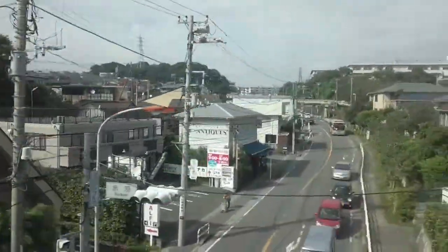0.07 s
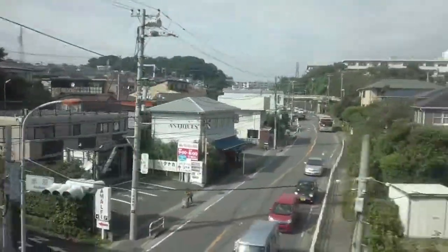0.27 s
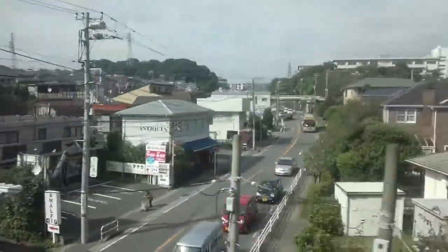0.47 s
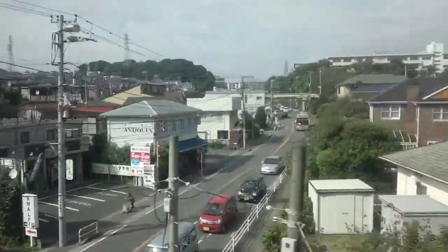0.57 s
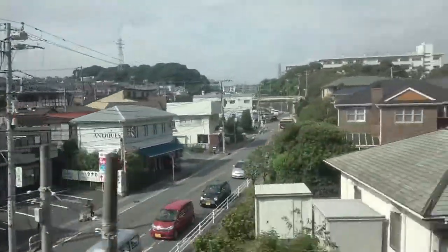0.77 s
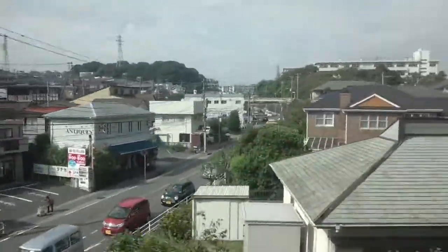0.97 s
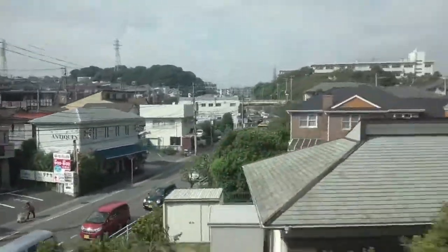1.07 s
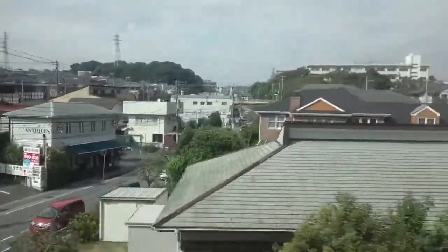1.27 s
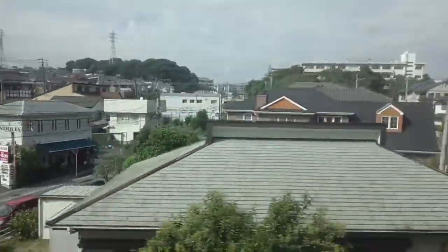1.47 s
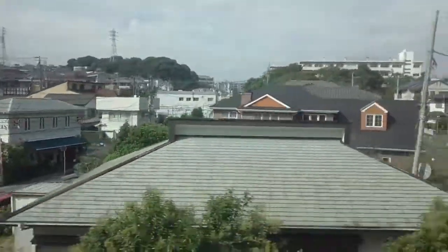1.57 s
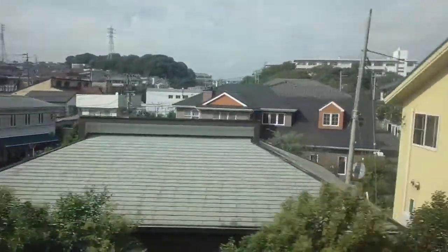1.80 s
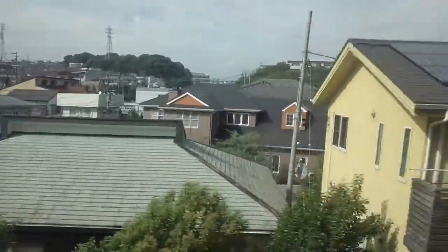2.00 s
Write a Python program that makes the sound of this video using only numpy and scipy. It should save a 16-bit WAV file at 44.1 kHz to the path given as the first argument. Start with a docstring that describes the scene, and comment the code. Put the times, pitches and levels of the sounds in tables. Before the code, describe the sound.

Inside a moving monorail car, low rumble and boom continue under loose panel knocks, thumps and faint ticks

```python
"""Suspended monorail car, interior

Heard from inside a moving car on rubber tyres: filtered noise makes the low sway and rumble, the
rush of the tyres and a thin hiss, and noise through cabin resonances makes the boom. Track bumps
thump the body in damped modes, and a loose panel knocks with a crack, a short ring and a low thud.
The fittings give ticks, each a snap and a brief crunch, and brief rattles of grainy noise."""
import sys
import numpy as np
from scipy import signal
from scipy.fft import rfft, irfft, next_fast_len
from scipy.io import wavfile
from scipy.ndimage import uniform_filter1d, map_coordinates

SR = 44100
rng = np.random.default_rng(int(sys.argv[2]) if len(sys.argv) > 2 else 0)


def transcribe(signal):
    """Save signal, clipped to [-1, 1], as a 16-bit WAV file at the path in sys.argv[1]."""
    frames = np.atleast_2d(signal).T
    limited = np.clip(frames, -1, 1)
    pcm = np.round(limited * 32767).astype(np.int16)
    wavfile.write(sys.argv[1], SR, pcm)


N = 89919  # samples

# Loose panel, its knocks: start_s, ring_db, crack_db, thud_db, crack_t60_s, crack_top_hz
PANEL_KNOCKS = [(0.0434, -0.5, -24.5, -9, 0.021, 4800), (.165, -11.5, -32.5, -5, 0.019, 4000),
                (0.2936, -22.5, -42, -29, .014, 2000), (0.7998, -4, -24, -7.5, 0.029, 6000),
                (0.8042, -19.5, -27, -4.5, 0.021, 6200), (0.955, -3.5, -28, -1, 0.034, 5660),
                (1.2974, -2, -22.5, 2.5, 0.025, 6230), (1.401, -16.5, -34.5, -13, .025, 4200),
                (1.593, -5.5, -26, -1, 0.016, 5000), (1.597, -11.5, -27.5, -27, 0.0094, 4800),
                (1.91, -1.5, -25, 2, 0.031, 6200), (2.01, -12, -42, -3.5, 0.023, 5000)]
# Loose panel, its ringing modes: pitch_hz, relative_level_db, t60_s
PANEL_MODES = [(485.4, -7.5, 0.021), (594, -0.5, 0.016), (590, -25.5, 0.031), (1005, -19, .009)]
# Mean spectrum of the panel's crack, before scatter: frequency_hz, relative_level_db
CRACK_SPECTRUM = [(300, -17.5), (900, 9.5), (1500, 3.5), (2300, 5.5), (3000, -3), (4200, 4), (6000, -6.5),
                  (8500, -12), (12000, -71)]
# Bumps in the track: start_s, level_db, pitch_hz, t60_s
TRACK_BUMPS = [(0.028, -7, 119, 0.13), (0.215, -7, 227.4, .13), (.297, -6.5, 90, 0.046),
               (0.336, -5.5, 211, 0.13), (.443, -17, 229.2, 0.11), (0.544, -9, 324, 0.082),
               (0.859, 0.5, 175, 0.037), (0.965, -20, 232.8, 0.35), (1.021, 2, 172, 0.017),
               (1.094, -13, 71, .09), (1.113, -1, 177, 0.044), (1.142, -8.5, 79, 0.082),
               (1.236, -12.5, 67.4, 0.19), (1.461, -9, 226.7, 0.19), (1.586, 1, 146, 0.029)]
# Ticks of the fittings: start_s, level_db, top_hz
FITTING_TICKS = [(.2172, -19.5, 16000), (.3415, -31, 6000), (.376, -39, 5500), (1.054, -34, 4200),
                 (1.431, -38, 5000), (1.468, -40, 5200), (1.569, -36, 6500)]
# Spectrum of a tick: frequency_hz, relative_level_db
TICK_SPECTRUM = [(1200, -8), (2700, -10), (3700, 9), (4700, 16), (6800, 5.5), (9000, -15.5), (15500, -21)]
# Rattles of the fittings: start_s, level_db, t60_s
FITTING_RATTLES = [(0.533, -29.5, 0.24), (1.164, -18, 0.089), (1.188, -24, 0.22)]
# Spectrum of a rattle: frequency_hz, relative_level_db
RATTLE_SPECTRUM = [(250, -18), (500, 12.5), (720, 4), (1200, -11), (1700, -28.5), (5000, -43),
                   (8000, -68.5)]
# Resonances of the cabin, lower and upper: centre_hz, width_hz, relative_level_db
LOWER_CABIN_MODES = [(172.5, 28.4, 2.5), (219.8, 10.4, 1)]
UPPER_CABIN_MODES = [(263.7, 150, -10), (344.2, 25, 1.5), (411.6, 11, 0.5)]
# Course of the lower and upper boom: time_s, level_db
LOWER_BOOM_COURSE = [(0, -18), (.12, -27.5), (.25, -23), (.36, -22.5), (.42, -35), (.47, -29), (.52, -42),
                     (.72, -30.5), (.86, -29.5), (1.0, -19.5), (1.13, -24), (1.36, -25.5), (1.42, -22.5),
                     (1.47, -20), (1.54, -20.5), (1.62, -19.5), (1.86, -38.5), (1.97, -24), (2.04, -33.5)]
UPPER_BOOM_COURSE = [(0, -29.5), (.15, -34), (.34, -30.5), (.42, -40.5), (.52, -37.5), (.59, -30.5),
                     (.66, -37), (.8, -36.5), (.97, -25.5), (1.05, -37.5), (1.12, -23.5), (1.25, -33),
                     (1.53, -34.5), (1.63, -22.5), (1.72, -43.5), (1.88, -33), (2.04, -32.5)]
# Course of the rumble and the sway: time_s, level_db
RUMBLE_COURSE = [(0.0, -24), (0.09, -26), (0.32, -23), (0.37, -27.5), (0.75, -24), (1.15, -20.5),
                 (1.19, -26.5), (1.28, -16.5), (1.34, -30), (1.6, -24.5), (1.92, -24.5), (1.95, -33),
                 (2.04, -23.5)]
SWAY_COURSE = [(0.0, -14), (0.09, -33), (0.12, -27.5), (0.22, -33.5), (0.31, -24), (0.4, -32), (0.6, -23),
               (1.26, -22), (1.32, -45), (1.59, -16.5), (1.66, -49), (1.78, -19), (1.87, -40),
               (2.04, -25.5)]
# Spectra of the rumble and the sway: frequency_hz, relative_level_db (per Hz)
RUMBLE_SPECTRUM = [(25, -23.5), (50, -0.5), (70, -1.5), (110, -0.5), (150, -12), (260, -11), (600, -67.5)]
SWAY_SPECTRUM = [(10, -10), (26, -3), (42, -5), (70, -27.5), (150, -66)]
# Course of the rush and the hiss, before lift, flutter and colour: time_s, level_db
RUSH_COURSE = [(0, -37), (.1, -44.5), (.3, -44), (.4, -51.5), (.51, -47.5), (.58, -40.5), (.75, -41.5),
               (.88, -36), (1.02, -40.5), (1.23, -39), (1.29, -36.5), (1.33, -47.5), (1.5, -46.5),
               (1.62, -42), (1.72, -48.5), (1.89, -41.5), (1.95, -49.5), (2.04, -38.5)]
HISS_COURSE = [(0, -44), (.04, -44.5), (.065, -55.5), (.14, -51), (.2, -50.5), (.24, -57.5), (.28, -47.5),
               (.33, -46.5), (.39, -56.5), (.47, -53.5), (.55, -56), (.7, -51), (.81, -43), (.94, -47.5),
               (.99, -56), (1.11, -44), (1.2, -50.5), (1.29, -49.5), (1.315, -62.5), (1.44, -60.5),
               (1.57, -49.5), (1.66, -56), (1.8, -48), (1.905, -41.5), (1.925, -60.5), (2.04, -54.5)]
# Spectra of the rush and the hiss, before colour: frequency_hz, relative_level_db (per Hz)
RUSH_SPECTRUM = [(150, -25), (330, -9.5), (450, 2.5), (680, 9.5), (850, 2), (1250, -3), (1800, -11),
                 (3000, -22.5), (6000, -77.5)]
HISS_SPECTRUM = [(500, -28.5), (1400, 3), (2200, 4), (3100, 3), (4000, 6.5), (4900, 8), (5600, -1),
                 (6500, -12), (7400, -24.5), (9000, -83.5)]
# Narrow resonances that colour the rush and hiss: centre_hz, width_hz, lift_db
CAR_COLOUR = [(1113, 48, 3.5), (2257, 35, 8.5), (3735, 31, 2), (4640, 67, 4.5), (6030, 670, 5.5)]

# The thud sinks from its start pitch towards its final pitch; sag and rise are time constants
THUD_START_HZ, THUD_HZ, THUD_SAG_S = 345, 185.8, 0.002
THUD_RISE_S, THUD_T60_S, THUD_LAG_S = 0.004, 0.035, 0.0033
CRACK_RISE_S, CRACK_SCATTER_DB = 0.0005, 1.5
KNOCK_SNAP_DB, TICK_SNAP_DB, SNAP_LAG_S = 15, 5, 0.0007
BUMP_RISE_S = 0.002
BUMP_OVERTONE, BUMP_OVERTONE_DB = 2.3, -22.5  # pitch ratio and relative level of the second mode
TICK_RISE_S, TICK_T60_S = 0.0002, 0.005
RATTLE_GRAIN_DB = 2.5  # scale of the random level changes, as are both flutters
CABIN_TOP_HZ = 470
RUSH_LIFT_DB, RUSH_FLUTTER_DB = 3, 1.8
HISS_LIFT_DB, HISS_FLUTTER_DB = 1.9, 1.0
GRIT_PER_S, GRIT_DB = 45, 4  # mean rate and relative strength of the grit in the hiss
TOP_HZ = 15800  # band limit of the microphone channel


def panel():
    """Each knock is a dull crack of its own colour and a short hollow ring, then a low thud of the wall."""
    out = np.zeros(N)
    for start_s, ring_db, crack_db, thud_db, crack_t60_s, top_hz in PANEL_KNOCKS:
        hollow = sum(amp(db) * ring(start_s, hz, t60_s, rise_s=0.0013) for hz, db, t60_s in PANEL_MODES)
        colour = [(hz, db + CRACK_SCATTER_DB * rng.standard_normal()) for hz, db in CRACK_SPECTRUM]
        crack = contact(start_s, colour, crack_t60_s, CRACK_RISE_S, KNOCK_SNAP_DB)
        out -= amp(ring_db) * hollow
        out -= amp(thud_db) * thud(start_s + THUD_LAG_S)
        out += amp(crack_db) * dulled(crack, top_hz)
    return out


def thud(start_s):
    """The wall flexes: its slow, low waves arrive last, so the pitch sinks."""
    t = since(start_s)
    # integral of the sinking pitch, in turns
    turns = THUD_HZ * t + (THUD_START_HZ - THUD_HZ) * THUD_SAG_S * (1 - np.exp(-t / THUD_SAG_S))
    return np.sin(2 * np.pi * turns) * fade(start_s, THUD_T60_S, THUD_RISE_S)


def bumps():
    """Soft jolts that make the body hum briefly in two damped modes."""
    out = np.zeros(N)
    for start_s, db, hz, t60_s in TRACK_BUMPS:
        hum = ring(start_s, hz, t60_s, BUMP_RISE_S)
        overtone = ring(start_s, hz * BUMP_OVERTONE, t60_s, BUMP_RISE_S)
        out += amp(db) * (hum + amp(BUMP_OVERTONE_DB) * overtone)
    return out


def ticks():
    """Fittings touch sharply: a snap and a very short bright crunch."""
    out = np.zeros(N)
    for start_s, db, top_hz in FITTING_TICKS:
        tick = contact(start_s, TICK_SPECTRUM, TICK_T60_S, TICK_RISE_S, TICK_SNAP_DB)
        out += amp(db) * dulled(tick, top_hz)
    return out


def rattles():
    """Fittings chatter: noise with a fast random grain, dying away after each start."""
    chatter = unit(noise(RATTLE_SPECTRUM) * amp(RATTLE_GRAIN_DB * wobble(220)))
    return chatter * sum(amp(db) * fade(start_s, t60_s, rise_s=0.0021)
                         for start_s, db, t60_s in FITTING_RATTLES)


def boom():
    """The cabin booms in a lower and an upper group of resonances, each with its own course."""
    lower = cabin(LOWER_CABIN_MODES) * amp(curve(LOWER_BOOM_COURSE))
    upper = cabin(UPPER_CABIN_MODES) * amp(curve(UPPER_BOOM_COURSE))
    return lower + upper


def cabin(modes):
    """Random shaking heard through resonances of the cabin, weakened towards the treble."""
    def response(f):
        resonances = sum(amp(db) * 1j * f * width / (centre ** 2 - f ** 2 + 1j * f * width)
                         for centre, width, db in modes)
        return resonances / (1 + (f / CABIN_TOP_HZ) ** 6)
    return steadied(filtered(rng.standard_normal(N), response), window_s=0.1)


def rumble():
    """Low noise of the running car, steadied and then set to its course."""
    return steadied(noise(RUMBLE_SPECTRUM), window_s=0.065) * amp(curve(RUMBLE_COURSE))


def sway():
    """The lowest noise of the car, steadied and then set to its course."""
    return steadied(noise(SWAY_SPECTRUM), window_s=0.15) * amp(curve(SWAY_COURSE))


def rush():
    """Tyre noise with a fluttering level, coloured by the car."""
    level_db = curve(RUSH_COURSE) + RUSH_LIFT_DB + RUSH_FLUTTER_DB * wobble(80)
    return coloured(noise(RUSH_SPECTRUM) * amp(level_db))


def hiss():
    """Thin, gritty noise with a fluttering level, coloured by the car."""
    level_db = curve(HISS_COURSE) + HISS_LIFT_DB + HISS_FLUTTER_DB * wobble(110)
    return coloured(noise(HISS_SPECTRUM) * amp(level_db) * gritty())


def gritty():
    """Gain of the hiss: tiny chance ticks stand out of it."""
    hits = (rng.random(N) < GRIT_PER_S / SR) * rng.random(N)
    tick_shape = fade(0, 2 * TICK_T60_S, TICK_RISE_S)
    return unit(1 + amp(GRIT_DB) * signal.fftconvolve(hits, tick_shape)[:N])


def coloured(x):
    """x through the narrow resonances of the car."""
    def response(f):
        return amp(sum(db / (1 + (2 * (f - centre) / width) ** 2) for centre, width, db in CAR_COLOUR))
    return filtered(x, response)


def contact(start_s, points, t60_s, rise_s, snap_db):
    """One sharp snap in a gritty, dying crunch, both with a (Hz, dB) spectrum."""
    force = steadied(rng.standard_normal(N), window_s=0.0025) * fade(start_s, t60_s, rise_s)
    force[round((start_s + SNAP_LAG_S) * SR)] -= amp(snap_db)
    return filtered(force, lambda hz: unit(spectrum_gain(points, hz)))


def ring(start_s, hz, t60_s, rise_s):
    """One damped mode struck at start_s."""
    return np.sin(2 * np.pi * hz * since(start_s)) * fade(start_s, t60_s, rise_s)


def fade(start_s, t60_s, rise_s):
    """Envelope of a blow: a rise with time constant rise_s under a decay of 60 dB per t60_s."""
    t = since(start_s)
    return np.exp(-np.log(1000) * t / t60_s) * (1 - np.exp(-t / rise_s))


def since(start_s):
    """Seconds since start_s, zero before."""
    return np.maximum(np.arange(N) / SR - start_s, 0)


def noise(points):
    """Noise of rms 1 with a (Hz, dB) spectrum."""
    return unit(filtered(rng.standard_normal(N), lambda hz: spectrum_gain(points, hz)))


def spectrum_gain(points, hz):
    """Gain at hz from (Hz, dB) points, joined over log frequency; -120 dB above the last."""
    f, db = np.transpose(points)
    return amp(np.interp(np.log(hz + 1), np.log(f), db, right=-120))


def steadied(x, window_s):
    """Noise of rms 1 with its slow chance swells evened out."""
    power = np.abs(uniform_filter1d(x * x, max(int(window_s * SR), 8)))
    return unit(x / np.sqrt(power + 1e-9))


def dulled(x, top_hz):
    """x with the treble above top_hz strongly weakened."""
    return filtered(x, lambda f: 1 / (1 + (f / top_hz) ** 10))


def filtered(x, response):
    """x times a response of frequency."""
    m = next_fast_len(N + SR // 2)  # silent padding for the tails
    return irfft(rfft(x, m) * response(np.fft.rfftfreq(m, 1 / SR)), m)[:N]


def curve(rows):
    """One value per sample from (s, value) rows."""
    return np.interp(np.arange(N) / SR, *np.transpose(rows))


def wobble(rate):
    """A smooth random curve, rate knots a second."""
    knots = rng.standard_normal(int(N * rate / SR) + 4)
    return map_coordinates(knots, [np.arange(N) * rate / SR])


def unit(x):
    """x scaled to rms 1."""
    return x / np.sqrt(np.mean(x ** 2) + 1e-20)


def amp(db):
    """Amplitude factor of a level in dB."""
    return 10 ** (np.asarray(db) / 20)


def scene():
    """Everything heard in the car, from the knocks to the running noise behind them."""
    blows = panel() + bumps() + ticks() + rattles()
    running = boom() + rumble() + sway() + rush() + hiss()
    return (blows + running)[None]


def record(dry):
    """The microphone channel keeps nothing from its band limit upwards."""
    return filtered(dry[0], lambda hz: hz < TOP_HZ)[None]


dry = scene()
out = record(dry)
transcribe(out)
```